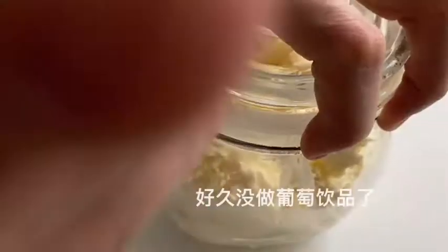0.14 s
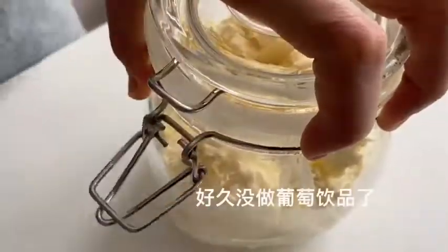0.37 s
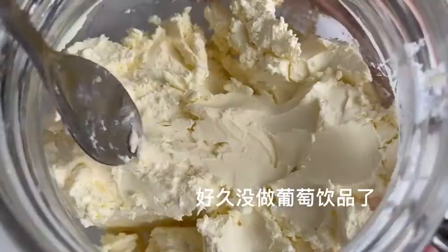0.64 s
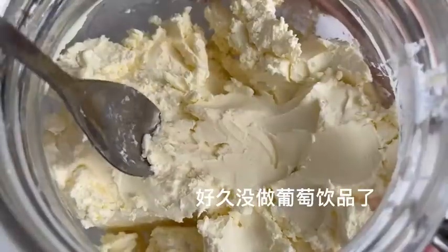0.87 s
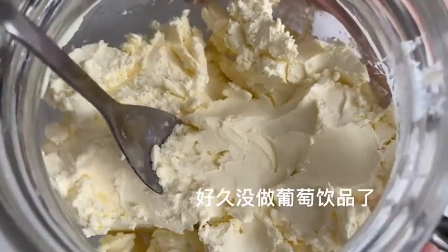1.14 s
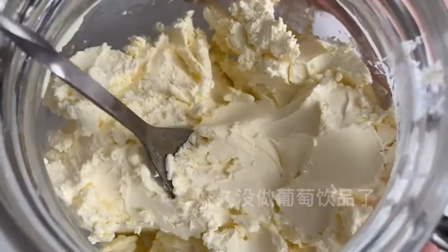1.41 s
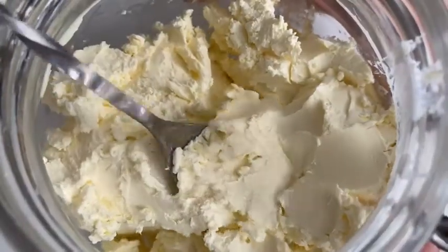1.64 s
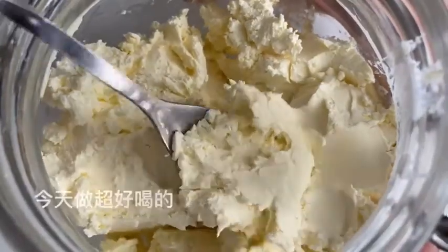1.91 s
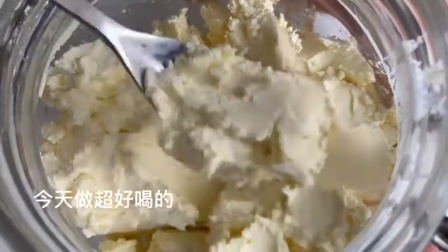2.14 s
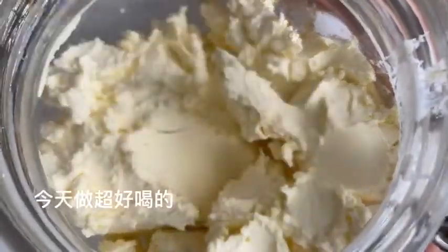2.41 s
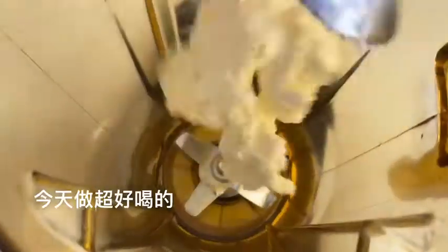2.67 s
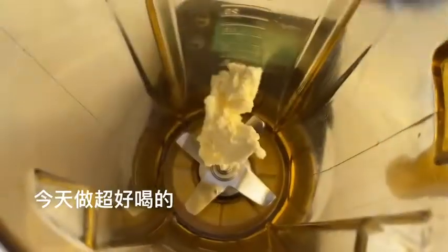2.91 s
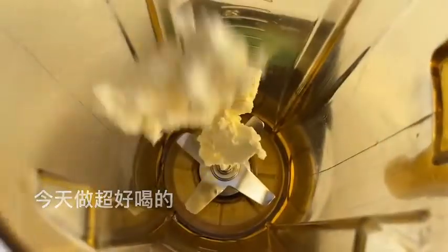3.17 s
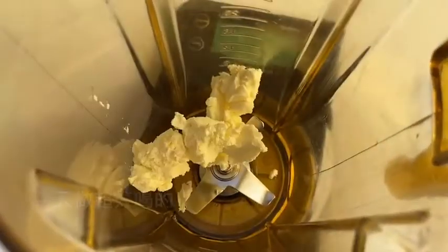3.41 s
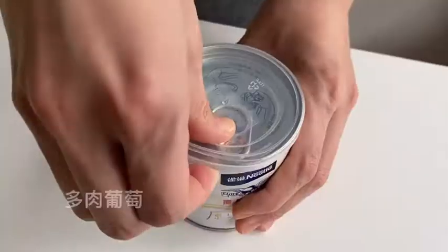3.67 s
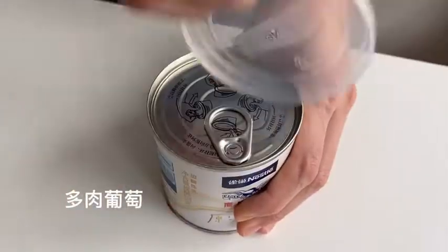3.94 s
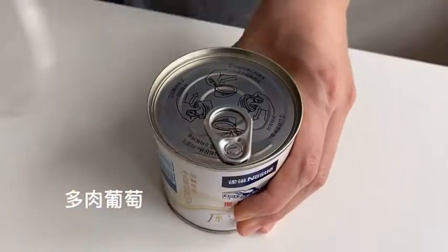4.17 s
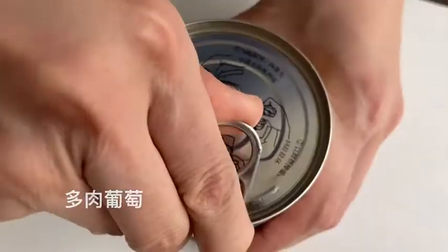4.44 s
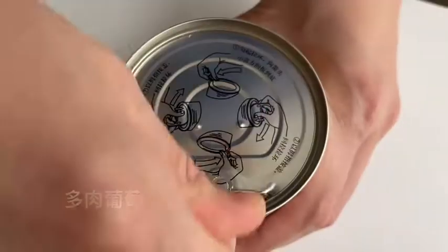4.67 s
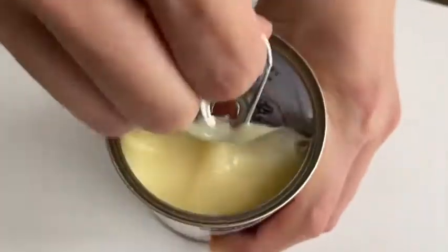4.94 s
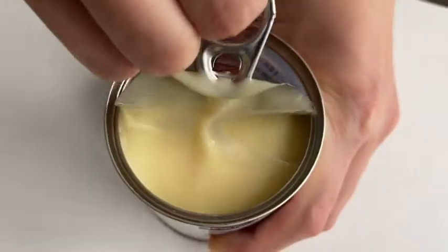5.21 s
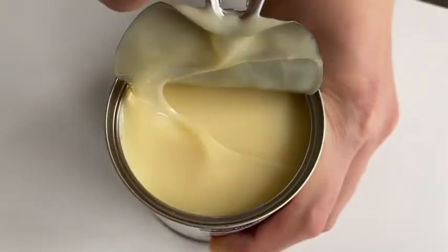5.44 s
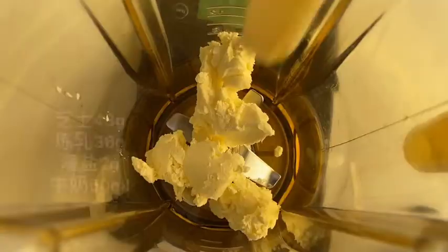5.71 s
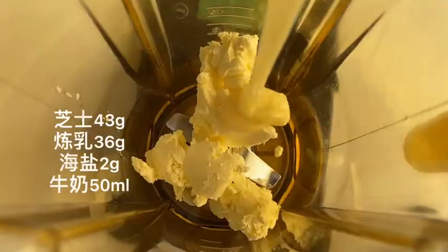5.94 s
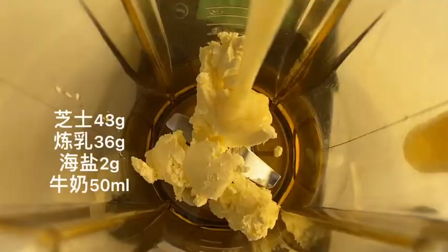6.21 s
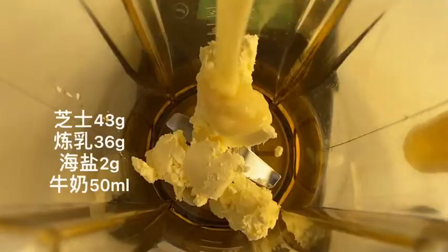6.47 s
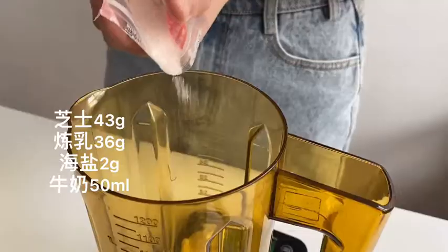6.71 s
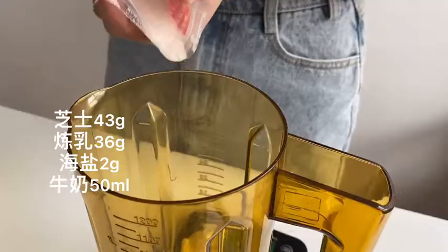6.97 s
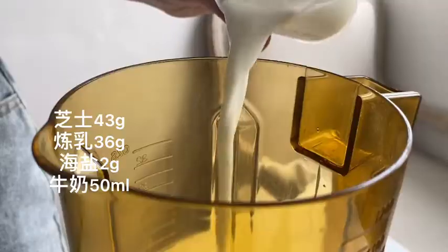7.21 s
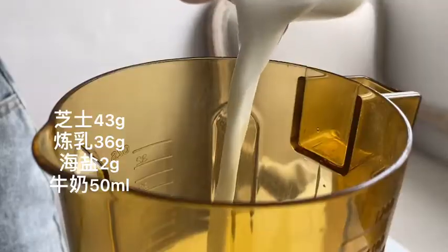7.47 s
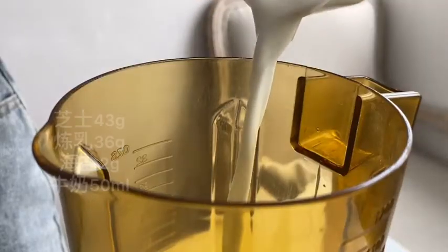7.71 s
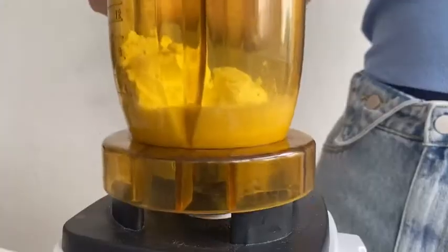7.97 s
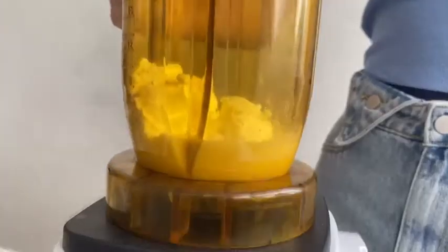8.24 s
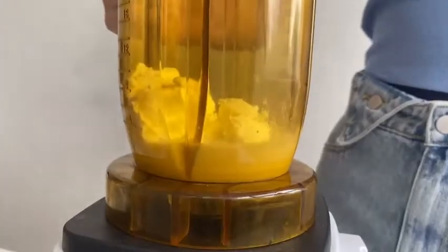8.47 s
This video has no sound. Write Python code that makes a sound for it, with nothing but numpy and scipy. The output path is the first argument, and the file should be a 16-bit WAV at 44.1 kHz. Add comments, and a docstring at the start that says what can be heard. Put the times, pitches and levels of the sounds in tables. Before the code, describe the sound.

A phone sits very close in a small, quiet room; abrupt cuts chop each tail, leaving tiny gaps. At 0 s a wire jar clasp snaps loudly with a dull thump and bright metallic ringing, again at 0.17, with smaller rattles until 0.35. Then it is very quiet: faint spoon scraping, sticky clicks and small glass knocks from 1.2 to 2.2. At 2.7 a cluster of hollow plastic knocks frees cheese into a jug, with weaker taps to 3.25. A thin lid pops softly around 3.8; a tin tab cracks at 4.45, then metal peels from 4.8 to 5.5. Spoon taps hit plastic at 5.9, 6.2 and 6.3. Salt patters finely at 6.6-7, milk fizzes and splashes at 7.2-7.8. Light bumps from 7.87 lead to a very loud jug clunk at 8.14, rattles, then switch clicks at 8.5 and a brief low motor buzz from 8.56.

```python
"""Close kitchen shots cut together: a jar clasp snaps open, a spoon scoops cream cheese and knocks it into a plastic jug,
a can loses its lid and is peeled open, a spoon taps the jug, salt and milk are poured, the jug is seated, a switch clicks.
Struck and rubbed objects ring in modes driven by noise; thuds are sinking sines, grains and wet clicks tiny noise bursts.
A phone hears it in a small quiet room; every cut chops the sound off and leaves a short gap."""
import sys
import numpy as np
from scipy import signal
from scipy.fft import rfft, irfft, next_fast_len
from scipy.io import wavfile
from scipy.ndimage import uniform_filter1d

SR = 44100
rng = np.random.default_rng(int(sys.argv[2]) if len(sys.argv) > 2 else 0)


def bounce(signal):
    """Save signal as a 16-bit WAV file at the path given by the first command-line argument."""
    frames = np.transpose(np.atleast_2d(signal))
    limited = np.clip(frames, -1, 1)
    pcm = np.round(limited * 32767).astype(np.int16)
    wavfile.write(sys.argv[1], SR, pcm)


def voltage_ratio(decibels):
    """Convert decibels (scalar or array-like) to amplitude ratios, 20 dB per decade."""
    exponent = np.asarray(decibels, float) / 20
    return 10 ** exponent


N = 379701
T = np.arange(N) / SR

# the shots that are cut together [start t/s, end t/s]
SHOTS = [(0, .346), (.366, 2.367), (2.377, 3.005), (3.008, 3.49), (3.51, 4.237), (4.243, 4.823),
         (4.829, 5.588), (5.609, 6.514), (6.533, 7.026), (7.036, 7.794), (7.813, 8.402), (8.425, 8.62)]
# modes of the plastic jug, knocked or tapped [f/Hz, level/dB, t60/s]
JUG_MODES = [(1110, -12.5, 0.048), (1450, -10, 0.037), (1800, 1, 0.0207), (2448, -7, 0.077),
             (2770, -3, 0.056), (3006, -4.5, 0.047), (3480, -4, 0.044), (4110, -8, 0.052)]
PLASTIC_SLOPES = (220, 200)  # strokes on plastic (swell, fall: dB per s)


def colour(x, points):
    """Shape by (Hz, dB) points on a log-frequency axis."""
    size = next_fast_len(len(x))
    hz, db = np.transpose(points)
    log_f = np.log(np.arange(size // 2 + 1) * SR / size + 1)
    gain = voltage_ratio(np.interp(log_f, np.log(hz), db))
    return irfft(rfft(x, size) * gain, size)[:len(x)]


def band(x, lo_hz, hi_hz):
    """Causal band-pass."""
    return signal.sosfilt(signal.butter(2, [lo_hz, hi_hz], "band", fs=SR, output="sos"), x)


def unit(x):
    """Scale to rms 1."""
    return x / np.sqrt(np.mean(x ** 2))


def power_sum(gains):
    """Unrelated sounds add in power."""
    return np.sqrt(np.sum(gains ** 2, axis=0))


def decay(t60, t):
    """Exponential fall of 60 dB in t60 seconds, 1 ms at the shortest."""
    return np.exp(-np.log(1000) * t / max(t60, 1e-3))


def curve(rows, column):
    """Gain along a table of levels, silent outside it."""
    rows = np.array(rows)
    return voltage_ratio(np.interp(T, rows[:, 0], rows[:, column], -140, -140))


def strokes(rows, slopes):
    """One gain per stroke: swell, hold, fall, silent outside its shot."""
    out = []
    for start, hold, db, *_ in rows:
        shot_start, shot_end = next(shot for shot in SHOTS if shot[1] > start)
        before = np.clip(start - T, 0, None)
        after = np.clip(T - start - hold, 0, None)
        loss = slopes[0] * before + slopes[1] * after
        out.append(voltage_ratio(db - np.minimum(loss, 200)) * (T >= shot_start) * (T < shot_end))
    return np.array(out)


def add(out, s, sound, peak_db):
    """Lay a sound at time s; the cut that ends its shot chops the tail."""
    start = int(s * SR)
    end = int(min(e for _, e in SHOTS if e > s) * SR)
    sound = sound[:min(end, N) - start]
    out[start:start + len(sound)] += voltage_ratio(peak_db) * sound / np.max(np.abs(sound))


def grit(per_s, spread_db, hiss):
    """Random tiny impacts of uneven size over a smooth hiss."""
    chance = rng.random((3, N))
    size = voltage_ratio(-spread_db * np.log(chance[1] + 0.055))
    clicks = (chance[0] < per_s / SR) * size * np.sign(chance[2] - .5)
    return unit(clicks) + hiss * rng.standard_normal(N)


def near_db(hz, centre_hz, focus):
    """Loss of a mode that lies away from the favoured pitch, focus dB an octave."""
    return -focus * np.abs(np.log2(hz / centre_hz))


def ring(modes, centre_hz, blur, focus):
    """Impulse response of an object: every mode is a cluster of close partials; those near the centre speak most."""
    t, out = T[:SR // 4], 0
    for hz, db, t60 in modes:
        partials = hz * (1 + blur * rng.standard_normal((6, 1)))
        cluster = np.sin(2 * np.pi * partials * t).sum(axis=0)
        out = out + voltage_ratio(db + near_db(hz, centre_hz, focus)) * decay(t60, t) * cluster
    return unit(out)


def rubbing(modes, rub, slopes, broad, per_s, blur, focus):
    """Grit feeds the modes and broad bands; the loudest stroke sets the favoured pitch."""
    rows, gains = np.array(rub), strokes(rub, slopes)
    heard = np.flatnonzero(gains.sum(axis=0))
    part = slice(heard[0], heard[-1])
    gains, push = gains[:, part], grit(per_s, 4.5, .6)[part]
    # the rub grips and slips: 70 random level jumps a second, 3.5 dB in spread
    hold = int(SR / 70)
    slips = np.repeat(rng.standard_normal(len(push) // hold + 1), hold)
    push = push * voltage_ratio(3.5 * uniform_filter1d(slips, size=SR // 300)[:len(push)])
    centre = uniform_filter1d(rows[gains.argmax(axis=0), 4], size=SR // 30)
    tonal = 0
    for hz, db, t60 in modes:
        mode = unit(band(push, hz * (1 - blur) - 1 / t60, hz * (1 + blur) + 1 / t60))
        tonal = tonal + voltage_ratio(db + near_db(hz, centre, focus)) * mode
    wide = sum(voltage_ratio(near_db(hz, centre, 31.0)) * unit(band(push, 0.87 * hz, 1.25 * hz))
               for hz in 600 * 1.5 ** np.arange(7))
    body = power_sum(gains) * unit(unit(tonal) + broad * unit(wide))
    treble = power_sum(gains * voltage_ratio(rows[:, 3:4])) * unit(band(push, 5200, 12000))
    out = np.zeros(N)
    out[part] = body + treble
    return out


def struck_and_rubbed(hits, modes, rub, slopes, crack, broad, per_s, blur, focus):
    """An object struck and rubbed: a burst of contact noise drives its modes and is also heard bare."""
    out, t = rubbing(modes, rub, slopes, broad, per_s, blur, focus), T[:SR // 4]
    for s, db, treble_db, contact, hz in hits:
        burst = rng.standard_normal(len(t)) * decay(contact, t) * (1 - decay(2.0 * contact, t))
        response = ring(modes, hz, blur, focus)
        # the first touch sets the modes off cleanly, the chatter after it smears them
        chatter = unit(signal.fftconvolve(burst, response)[:len(t)])
        body = unit(0.48 * response + chatter)
        bare = unit(band(burst, 850, 5100))
        add(out, s, body * (1 - decay(0.1 * contact, t)) + crack * bare, db)
        bright = signal.fftconvolve(burst, ring(modes, 11000, blur, 0))[:len(t)]
        shine = band(bright, 5400, 19845) / np.std(body) / np.sqrt(np.sum(burst ** 2))
        add(out, s, band(unit(burst) + 3.3 * shine, 5300, 10000), db + treble_db)
    return out


def clasp():
    """The jar's wire clasp snaps open: sharp contacts ring long, bright modes."""
    # snaps [t/s, peak level/dB, treble above it/dB, contact burst t60/s, favoured f/Hz]
    hits = [(0.002, -5, 1.5, 0.022, 2200), (0.17, -8.5, 5, 0.012, 2300), (0.247, -20, 6, 0.016, 2280),
            (0.304, -23, 6.5, 0.027, 2300)]
    # modes of the clasp [f/Hz, level/dB, t60/s]
    modes = [(189.4, -3.5, 0.25), (373, -10, 0.091), (760, -9, 0.023), (1100, -12.5, 0.022),
             (2291, -5, 0.13), (2940, -16.5, 0.013), (4280, -8, 0.021), (6174, -15, 0.031),
             (8770, -7.5, 0.17), (10600, -6.5, 0.077), (11680, -9.5, 0.22), (15100, -9, .04)]
    # rubbing strokes [start t/s, hold/s, level/dB, treble above it/dB, favoured f/Hz]
    rub = [(0.0, 0.15, -43.5, -0.5, 1204), (.168, 0.036, -41, 10.5, 2300), (0.297, 0.016, -46.5, 8, 2290)]
    return struck_and_rubbed(hits, modes, rub, slopes=(700, 160), crack=0.26, broad=0.12, per_s=3100,
                             blur=.04, focus=2.5)


def background():
    """Low rumble from the hands and a room tone; their levels differ from shot to shot."""
    # rumble of hands on the table, one per shot [level/dB]
    rumble_db = [-54, -51.5, -48, -57, -58, -62.5, -58.5, -47, -57, -52, -52.5, -50.5]
    # hands pressing harder [start t/s, hold/s, level/dB, upper part above it/dB]
    presses = [(0.0, 0.017, -33.5, 13), (0.11, 0.18, -52, 14.5), (1.391, 0.9, -50, -3),
               (2.8, 0.11, -47.5, -3), (4.645, 0.11, -53.5, -7), (7.497, 0.24, -52.5, -10),
               (7.928, 0.052, -47.5, 9.5), (8.174, 0.083, -28.5, -1)]
    # room tone, one per shot [level/dB]
    tone_db = [-57.5, -68, -58, -66.5, -67, -68.5, -73.5, -60.5, -70, -58.5, -56.5, -55.5]
    # colour of the room tone [f/Hz, relative level per Hz/dB]
    tone_colour = [(180, -5.5), (300, -2.5), (404, -16.5), (508, -16), (586, -16), (735, -11),
                   (1190, -16.5), (1940, -20.5), (2880, -33.5), (9000, -43.5), (11700, -57), (19800, -89.5)]
    shot = np.searchsorted(np.array(SHOTS)[1:, 0], T)
    deep, upper, tone = rng.standard_normal((3, N))
    rest = voltage_ratio(np.array(rumble_db)[shot])
    press = strokes(presses, (110, 230))  # swell, fall: dB per s
    deep_gain = np.hypot(rest, power_sum(press))
    upper_press = power_sum(press * voltage_ratio(np.array(presses)[:, 3:]))
    upper_gain = np.hypot(voltage_ratio(-6.5) * rest, upper_press)
    rumble = deep_gain * unit(band(band(deep, 33, 78), 41, 180)) + upper_gain * unit(band(upper, 110, 290))
    return rumble + voltage_ratio(np.array(tone_db)[shot]) * unit(colour(tone, tone_colour))


def room(x, gap_s):
    """A noise tail that loses its treble first, restarted by every cut."""
    t, noise = T[:SR // 2], rng.standard_normal((2, SR // 2))
    tail = band(noise[0], 130, 1300) * decay(0.53, t) + band(noise[1], 1700, 15000) * decay(0.31, t)
    tail = tail * (t > gap_s) / np.sqrt(np.sum(tail ** 2))
    out = np.zeros(N)
    for start, end in SHOTS:
        part = slice(int(start * SR), min(int(end * SR), N))
        out[part] = signal.fftconvolve(x[part], tail)[:len(x[part])]
    return voltage_ratio(-10) * out


def thuds():
    """The table top bends: a swing that sinks in pitch, the lowest part arriving last."""
    # dull knocks through the table; pitch glides from 1.3 to 0.85 of f [t/s, peak level/dB, f/Hz, t60/s]
    knocks = [(0.008, -5, 319, 0.017), (0.017, -4.5, 66.96, 0.009), (0.17, -25.5, 185, 0.062),
              (1.238, -37.5, 166, 0.039), (1.695, -28, 252, 0.064), (2.051, -34.5, 60.5, 0.043),
              (2.086, -34, 66, 0.34), (2.719, -13.5, 72.4, 0.009), (2.768, -26, 53, 0.29),
              (2.98, -29, 58.5, 0.05), (3.177, -33.5, 58, 0.088), (3.765, -34.5, 220, 0.026),
              (3.867, -41, 169, 0.037), (4.452, -19.5, 147, 0.066), (4.77, -31.5, 143, 0.058),
              (4.884, -41.5, 141.7, 0.17), (5.239, -34, 118, 0.044), (7.875, -22.5, 70.0, 0.067),
              (7.918, -25, 60.7, 0.081), (8.152, -0.5, 93.4, 0.037), (8.177, -13, 74.4, 0.071),
              (8.331, -27.5, 268, 0.2)]
    out, t = np.zeros(N), T[:SR // 3]
    for s, db, hz, t60 in knocks:
        glide = hz * (.85 + 0.45 * np.exp(-t / 0.0076))
        phase = 2 * np.pi * np.cumsum(glide) / SR
        add(out, s, -np.sin(phase) * decay(t60, t) * (1 - np.exp(-t / 0.0022)), db)
    return out


def jar():
    """The glass jar is rubbed and knocked: noise drives its short modes."""
    # knocks [t/s, peak level/dB, treble above it/dB, contact burst t60/s, favoured f/Hz]
    hits = [(1.238, -26, -42, 0.016, 1040), (1.702, -30, 1, 0.017, 528), (1.875, -45.5, 1, 0.044, 533),
            (1.958, -34, 4.5, 0.038, 530), (2.002, -37, -20, 0.013, 630), (2.089, -29.5, -4, 0.0165, 528),
            (2.131, -34.5, 0.5, 0.016, 3360), (2.159, -42.5, 8.5, 0.011, 530)]
    # modes of the jar [f/Hz, level/dB, t60/s]
    modes = [(533, -2, 0.23), (632.4, -7, 0.085), (1049, -0.5, 0.0156), (2350, -5, 0.05),
             (2490, -11, 0.041), (3375, -4.5, 0.057), (4285, -44, 0.18), (6640, -29, 0.055),
             (7300, -25.5, 0.095), (8980, -3, 0.056)]
    # rubbing strokes [start t/s, hold/s, level/dB, treble above it/dB, favoured f/Hz]
    rub = [(.42, .2, -77.5, -10.5, 2270), (.85, 0.27, -77, 1.5, 1100), (1.26, 0.094, -63.5, 1.5, 1500),
           (1.24, 0.87, -103.5, 37.5, 1190), (1.642, 0.093, -58, -3, 974), (1.902, .26, -58.5, -2, 2850)]
    return struck_and_rubbed(hits, modes, rub, slopes=(290, 560), crack=0.26, broad=0.51, per_s=700,
                             blur=0.034, focus=4.4)


def scattered(start, end, db, lo_hz, hi_hz, count):
    """Rows of clicks at random moments, sizes (up to 8 dB below db) and pitches."""
    when, size, pitch = rng.random((count, 3)).T
    return list(zip(start + when * (end - start), db - 8 * size, lo_hz * (hi_hz / lo_hz) ** pitch))


def wet_clicks():
    """Wet clicks: a few ms of noise around a centre."""
    # the loudest: cheese letting go of the spoon, first salt, milk splashing [t/s, peak level/dB, centre f/Hz]
    loudest = [(0.5641, -53.5, 9000), (1.1297, -34.5, 11510), (1.3976, -35, 11440), (1.5035, -32.5, 11610),
               (1.5923, -44.5, 10600), (6.5677, -34.5, 10820), (7.2038, -31.5, 6295), (7.235, -33.5, 9200),
               (7.3056, -28, 7300), (7.4126, -29.5, 7190), (7.5037, -38, 5450), (7.528, -28, 5160),
               (7.541, -33, 6510), (7.569, -31, 3500), (7.653, -42, 3766), (7.6692, -23.5, 11040),
               (7.431, -33.5, 3810), (7.6909, -32, 2098), (7.7037, -32.5, 5500), (7.7513, -34.5, 6780),
               (7.7812, -35, 3666)]
    sticky = scattered(0.95, 2.2, -48, 5500, 11500, count=24)
    splashy = scattered(7.4, 7.79, -37, 3000, 8000, count=12)
    out = np.zeros(N)
    for s, db, hz in loudest + sticky + splashy:
        burst = rng.standard_normal(SR // 20) * decay(0.014, T[:SR // 20])
        add(out, s, unit(band(burst, .75 * hz, 1.52 * hz)) + 0.11 * unit(band(burst, 1800, 10000)), db)
    return out


def jug():
    """The plastic jug takes the knocks that free the cheese: noise drives its damped modes."""
    # knocks [t/s, peak level/dB, treble above it/dB, contact burst t60/s, favoured f/Hz]
    hits = [(2.7024, -27, -5, 0.045, 2480), (2.7137, -25, -39, 0.025, 1400),
            (2.7322, -21.5, -45.5, 0.0078, 1960), (2.7541, -34, -40, 0.017, 1790),
            (2.815, -32.5, -28, 0.016, 1780), (2.8644, -42.5, -25, 0.032, 1814),
            (2.8891, -40.5, -24, 0.0078, 1900), (2.9462, -41.5, -18.5, 0.027, 1800),
            (3.1517, -44.5, -11, 0.022, 1540), (3.1904, -44, -10, 0.0174, 1785),
            (3.2488, -53.5, -35.5, 0.01, 1834)]
    # rubbing strokes [start t/s, hold/s, level/dB, treble above it/dB, favoured f/Hz]
    rub = [(2.38, .27, -74.5, 0.5, 1530), (2.72, 0.081, -56, -21, 1800), (3.13, 0.057, -73, -3.5, 1700)]
    return struck_and_rubbed(hits, JUG_MODES, rub, PLASTIC_SLOPES, crack=0.095, broad=0.31, per_s=1100,
                             blur=0.0472, focus=12.4)


def jug_boom():
    """The hollow jug booms on its lowest note: a sine with a little narrow noise around it."""
    # swells of the boom [start t/s, hold/s, level/dB]
    swells = [(2.699, 0.039, -23.5), (2.82, 0.16, -57), (3.208, 0.037, -55), (5.62, .88, -64.5)]
    hz = 428.8
    noise = unit(band(rng.standard_normal(N), hz - 25, hz + 25))
    note = unit(np.sin(2 * np.pi * hz * T) + 0.18 * noise)
    return power_sum(strokes(swells, (7400, 400))) * note  # swell, fall: dB per s


def lid():
    """The can's thin lid comes off: contacts and rubs drive blurred, quickly dying modes."""
    # knocks [t/s, peak level/dB, treble above it/dB, contact burst t60/s, favoured f/Hz]
    hits = [(3.77, -33, -6.5, 0.02, 804), (3.838, -45, -4, 0.062, 441), (3.863, -37.5, -4, 0.024, 447)]
    # modes of the lid [f/Hz, level/dB, t60/s]
    modes = [(435, 0, 0.062), (853, 17.5, 0.0584), (1294, -9, 0.022), (1900, 18.5, 0.007), (3070, 5, .03),
             (4760, -10.5, .03)]
    # rubbing strokes [start t/s, hold/s, level/dB, treble above it/dB, favoured f/Hz]
    rub = [(3.63, 0.036, -77, -17.5, 2650), (3.69, 0.075, -67.5, -11, 3380), (3.78, 0.025, -67.5, 3, 2460),
           (3.84, 0.018, -69.5, -7, 4500), (3.975, 0.022, -72.5, -2.5, 4400), (4.35, 0.036, -77, 3.5, 4660)]
    return struck_and_rubbed(hits, modes, rub, slopes=(560, 800), crack=0.77, broad=0.83, per_s=3900,
                             blur=0.16, focus=22.0)


def can():
    """The tin can is peeled open: contacts and rubs drive its modes, the lowest ringing longest."""
    # knocks [t/s, peak level/dB, treble above it/dB, contact burst t60/s, favoured f/Hz]
    hits = [(4.446, -18.5, -13, 0.014, 1607), (4.765, -41.5, -15.5, 0.013, 1110),
            (4.887, -26.5, -23, 0.0084, 1310), (4.91, -34, -25.5, 0.011, 1360),
            (5.112, -53.5, -29, 0.018, 2120), (5.235, -34.5, -48, 0.0051, 760),
            (5.45, -47, -23.5, 0.0108, 764)]
    # modes of the can [f/Hz, level/dB, t60/s]
    modes = [(441, 3, 0.16), (616.3, 4, 0.036), (908, -0.5, 0.028), (1210, -5.5, 0.082),
             (1400, -1.5, 0.039), (1883, -1.5, 0.021), (2100, -4.5, 0.03), (2530, -1.5, 0.018),
             (3190, -5, 0.032), (3850, -3.5, 0.04)]
    # rubbing strokes [start t/s, hold/s, level/dB, treble above it/dB, favoured f/Hz]
    rub = [(4.452, .03, -56.5, -29.5, 1600), (4.769, .02, -63.5, -2, 1054),
           (4.872, 0.026, -44.5, -26.5, 1320), (5.142, 0.064, -47.5, -16.5, 1900),
           (5.44, .02, -76.5, -10, 1900)]
    return struck_and_rubbed(hits, modes, rub, slopes=(660, 490), crack=0.11, broad=0.39, per_s=1100,
                             blur=0.057, focus=12.2)


def spoon_on_jug():
    """A spoon taps the jug: the same plastic modes, held closely to the struck spot's pitch."""
    # taps [t/s, peak level/dB, treble above it/dB, contact burst t60/s, favoured f/Hz]
    hits = [(5.696, -51.5, -11, 0.0091, 1478), (5.885, -21, -36.5, 0.011, 1930),
            (6.02, -54.5, -26, 0.0053, 1180), (6.167, -28, -42.5, 0.012, 1890),
            (6.195, -56, -27.5, 0.0088, 1860), (6.277, -27, -45, 0.0084, 1900),
            (6.409, -53.5, -42, 0.018, 1890)]
    # rubbing strokes [start t/s, hold/s, level/dB, treble above it/dB, favoured f/Hz]
    rub = [(5.62, 0.1, -71.5, -10, 1020), (5.901, 0.051, -71, -2, 1800), (6.03, 0.056, -52.5, -37, 1400),
           (6.14, 0.13, -56.5, -14.5, 1770), (6.4, 0.03, -59, -18, 1810)]
    return struck_and_rubbed(hits, JUG_MODES, rub, PLASTIC_SLOPES, crack=0.53, broad=0.25, per_s=400,
                             blur=0.027, focus=23.0)


def hum():
    """A faint wavering hum: a very narrow band of noise."""
    hz, db, start, end = (185, -58.5, 6, 7.5)  # one row [f/Hz, level/dB, start t/s, end t/s]
    return voltage_ratio(db) * unit(band(rng.standard_normal(N), hz - 6, hz + 6)) * (T > start) * (T < end)


def salt():
    """Salt is a dense patter of grains."""
    # shakes of salt [start t/s, hold/s, level/dB]
    shakes = [(6.573, 0.013, -54), (6.71, .01, -57.5), (6.75, 0.22, -66.5), (6.97, .02, -54)]
    # colour of the patter [f/Hz, relative level per Hz/dB]
    tone = [(880, -42), (1500, -13.5), (7390, -6), (9100, 4), (11000, -4), (13300, -4.5), (14900, -6),
            (16000, -6)]
    patter = unit(colour(grit(6000, 0.99, .5), tone))
    return power_sum(strokes(shakes, (510, 140))) * patter  # swell, fall: dB per s


def bubbles(start, end, count, cycles, spread_db):
    """Tiny bubbles burst while the milk runs, each a short rising chirp."""
    out, t = np.zeros(N), T[:SR // 100]
    for when, pitch, size in rng.random((count, 3)):
        hz = 2300 * 4.5 ** pitch
        chirp = np.sin(2 * np.pi * hz * t * (1 + 12 * t)) * decay(cycles / hz, t)
        add(out, start + when * (end - start), chirp, -spread_db * np.log(size + 0.023))
    return out / np.std(out[int(start * SR):int(end * SR)])


def milk():
    """Milk is a fizz of uneven tiny impacts with bursting bubbles."""
    # gain of the flow, which fizz and bubbles share [t/s, level/dB]
    flow = [(7.172, -59), (7.24, -55.5), (7.364, -40), (7.49, -55), (7.564, -48.5), (7.793, -53)]
    # colour of the fizz [f/Hz, relative level per Hz/dB]
    tone = [(530, -48), (900, -6), (1160, -45), (2090, -6.5), (2630, -12), (6890, -5.5), (9090, 8.5),
            (10800, -2), (16000, -17)]
    fizz = unit(colour(grit(1600, 5.2, 0.35), tone))
    bursts = bubbles(flow[0][0], flow[-1][0], count=260, cycles=47.0, spread_db=6.5)
    return curve(flow, 1) * (fizz + 0.38 * bursts)


def base():
    """The jug is seated on its base and the switch clicks: contact noise drives short modes."""
    # blows [t/s, peak level/dB, treble above it/dB, contact burst t60/s, favoured f/Hz]
    hits = [(7.869, -28, -17.5, 0.015, 598), (7.881, -40.5, -0.5, 0.015, 585),
            (7.907, -29.5, -9, 0.025, 966), (7.918, -26, -24.5, 0.01, 911),
            (7.969, -33.5, -15.5, 0.016, 879), (8.004, -45.5, -38.5, 0.0087, 1450),
            (8.045, -39, -17, 0.017, 2014), (8.103, -28, -24, 0.015, 891), (8.128, -16, -26.5, 0.015, 2112),
            (8.138, -2.5, -36, 0.013, 1652), (8.142, -8, -33, 0.015, 1500),
            (8.147, -10, -32.5, 0.0089, 1500), (8.251, -16.5, -23, 0.015, 1010),
            (8.328, -14, -58.5, 0.012, 2020), (8.505, -14, -18, 0.024, 849.5),
            (8.553, -11.5, -35.5, 0.0092, 1530)]
    # modes of the base [f/Hz, level/dB, t60/s]
    modes = [(452.4, -6, .03), (930, -4.5, 0.0069), (1046, -5.5, 0.053), (1500, 1.5, 0.027),
             (2086, 2.5, 0.044), (2486, 2.5, 0.045), (3050, -3, .03), (3666, 2, 0.04), (4300, -19, 0.04)]
    # rubbing strokes [start t/s, hold/s, level/dB, treble above it/dB, favoured f/Hz]
    rub = [(7.931, 0.065, -52.5, -21.5, 900), (8.15, .06, -50.5, -15, 1500), (8.237, .01, -35, -22, 2220),
           (8.298, 0.15, -44, -4.5, 1100), (8.52, 0.11, -55, -21.5, 1500)]
    return struck_and_rubbed(hits, modes, rub, PLASTIC_SLOPES, crack=0.19, broad=0.76, per_s=3700,
                             blur=0.06, focus=11)


def motor_buzz():
    """The motor winding buzzes as the switch closes: a tone and its octave fade in."""
    start, hz, db = (8.556, 300, -29)  # one row [start t/s, f/Hz, level/dB]
    swing = np.sin(2 * np.pi * hz * T) + 0.15 * np.sin(2 * np.pi * 2 * hz * T)
    return voltage_ratio(db) * swing * np.clip((T - start) / 0.014, 0, 1)


def scene():
    """What reaches the two microphone ports."""
    near = (clasp() + thuds() + jar() + wet_clicks() + jug() + jug_boom() + lid() + can()
            + spoon_on_jug() + hum() + salt() + milk() + base() + motor_buzz())
    # the second port hears the near sound scattered round the phone body
    scatter = band(rng.standard_normal(SR // 40) * decay(0.01, T[:SR // 40]), 400, 18000)
    far = signal.fftconvolve(near, scatter / np.sqrt(np.sum(scatter ** 2)))[:N]
    # 1.7 ms ramps at the cuts; the very first shot starts at full level
    cuts = sum(np.clip(np.minimum(T - a + (a == 0), b - T) / 0.0017, 0, 1) for a, b in SHOTS)
    ports = np.array([x + room(near, 0.0013) + background() for x in (near, far)])
    return (cuts + voltage_ratio(-33.0)) * ports  # a faint remainder fills the gaps


def low_pass(x):
    """Removes everything above the highest recorded frequency."""
    return signal.sosfilt(signal.butter(12, 16420, fs=SR, output="sos"), x)


def record(dry):
    """The ports are mixed to left and right; in the treble their spacing makes them agree and oppose in turn."""
    # stereo mix of the ports [f/Hz, lean to the left/0-1, lead of the left/0-1, share that differs/0-1]
    ports = [(60, .075, .05, .1), (250, .15, .2, .25), (700, .17, .4, .5), (2500, .22, .4, .5),
             (5000, .25, .1, .4), (6800, .02, .02, .1)]
    size = next_fast_len(N)
    a, b = rfft(band(dry, 33, 19845), size)
    f = np.arange(len(a)) * SR / size
    hz, lean, lead, differ = np.transpose(ports)
    # from 6900 Hz up the ports go from agreeing to agreeing again every 4200 Hz
    turn = np.pi * np.clip(f - 6900, 0, None) / 4200
    mid = a * np.cos(turn) ** 2
    differing = np.interp(f, hz, differ) + 1.5 * np.sin(turn) ** 2
    side = np.interp(f, hz, lean + 1j * lead) * a + differing * b
    stereo = irfft(np.array([mid + side, mid - side]), size)[:, :N]
    return low_pass(np.clip(stereo, -1, 1))


dry = scene()
out = record(dry)
bounce(out)
```